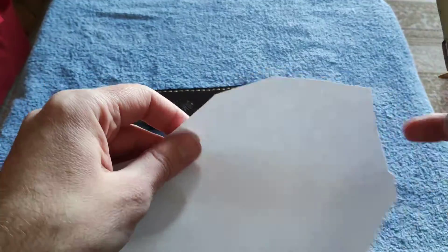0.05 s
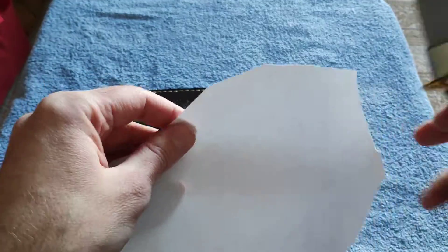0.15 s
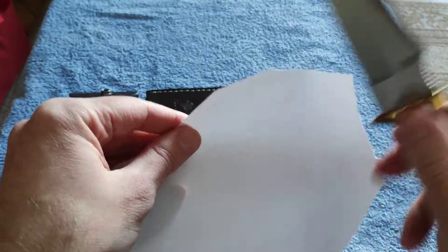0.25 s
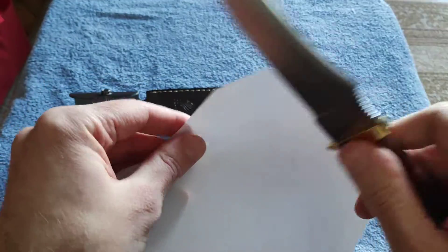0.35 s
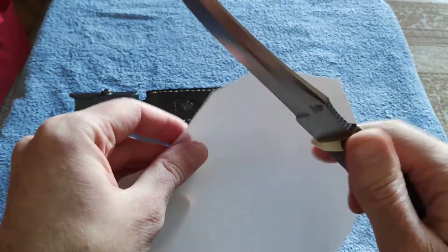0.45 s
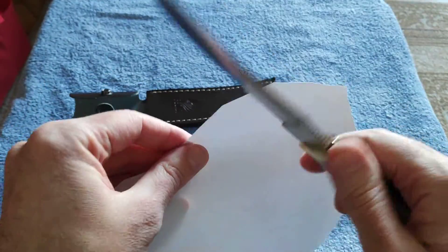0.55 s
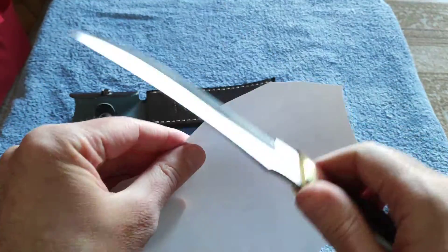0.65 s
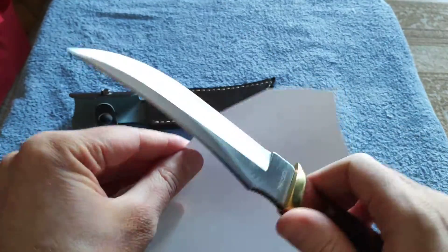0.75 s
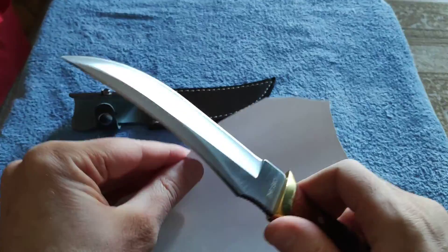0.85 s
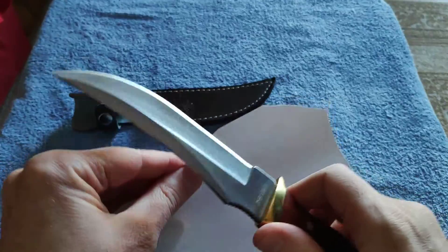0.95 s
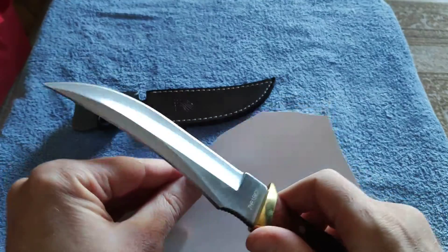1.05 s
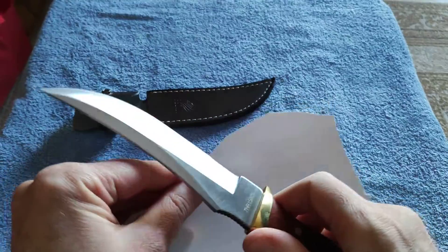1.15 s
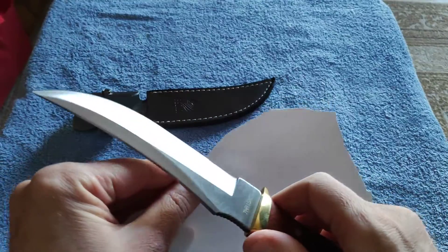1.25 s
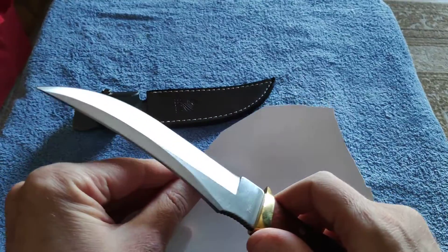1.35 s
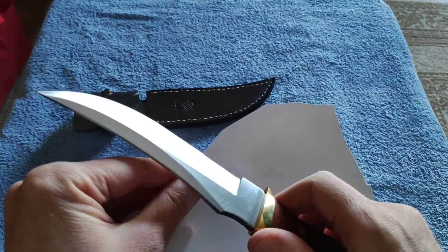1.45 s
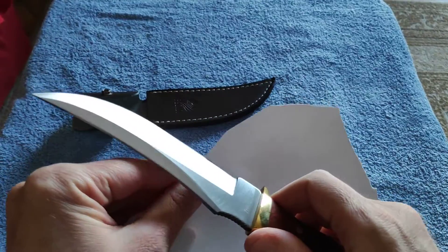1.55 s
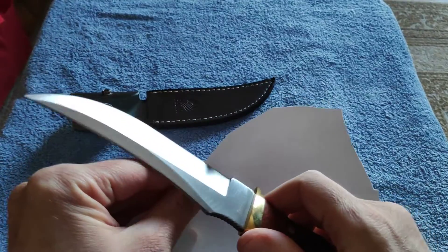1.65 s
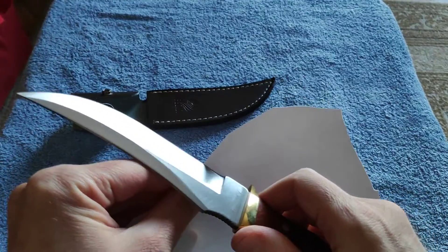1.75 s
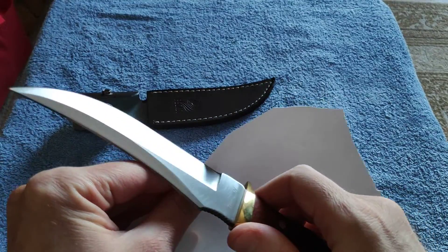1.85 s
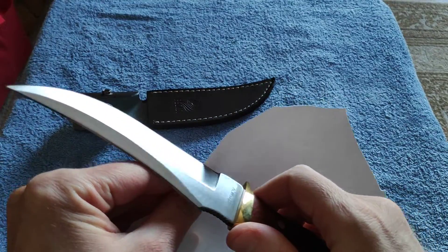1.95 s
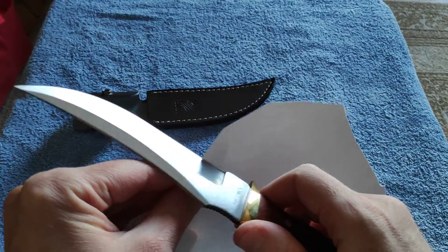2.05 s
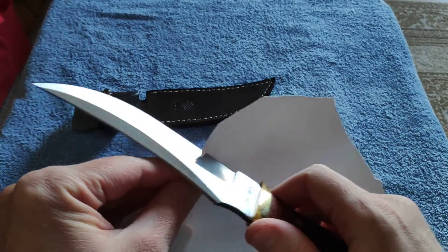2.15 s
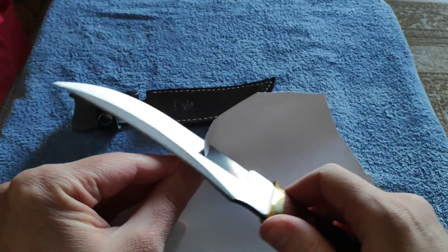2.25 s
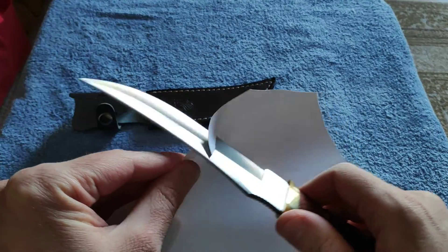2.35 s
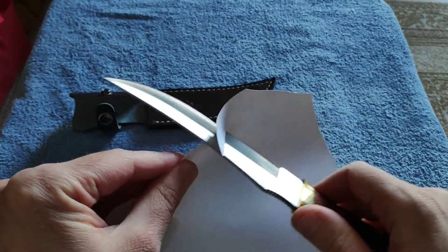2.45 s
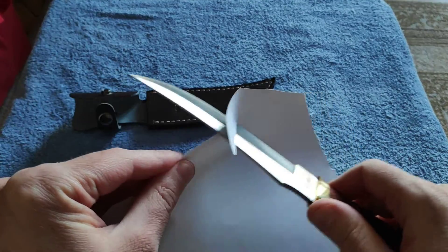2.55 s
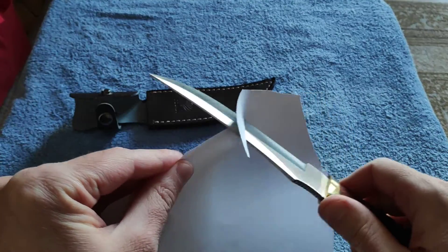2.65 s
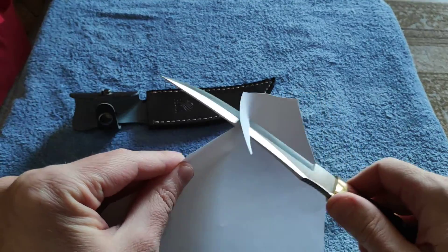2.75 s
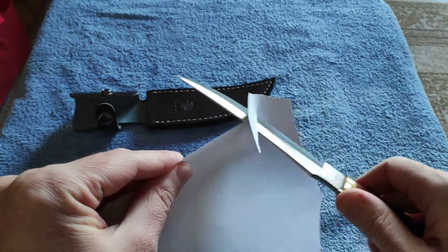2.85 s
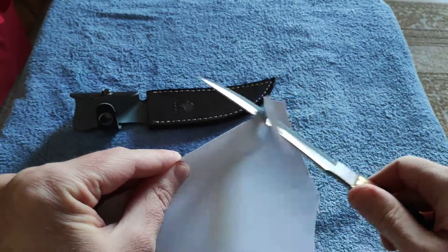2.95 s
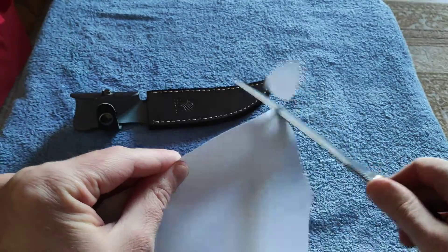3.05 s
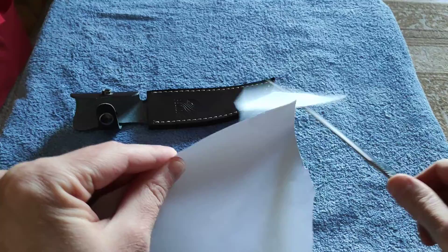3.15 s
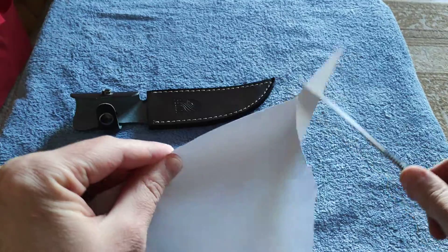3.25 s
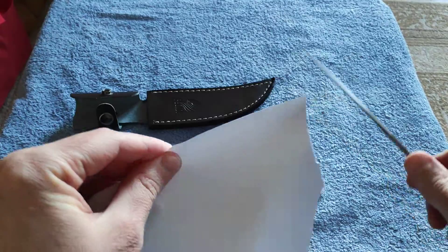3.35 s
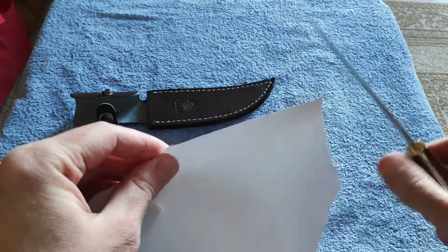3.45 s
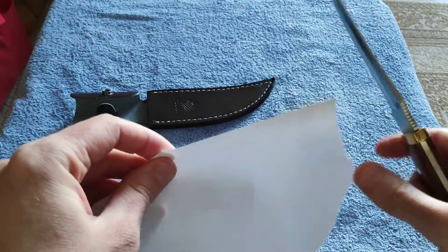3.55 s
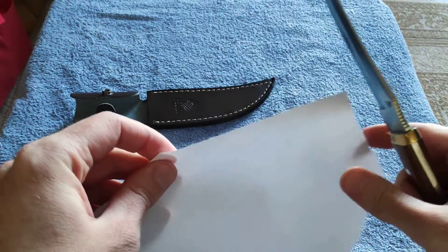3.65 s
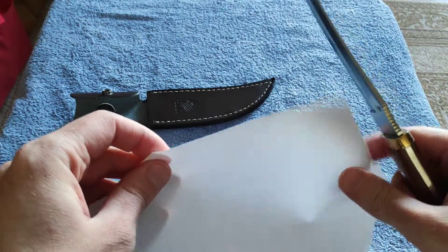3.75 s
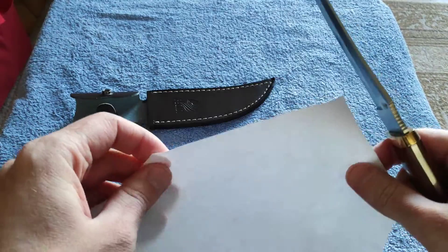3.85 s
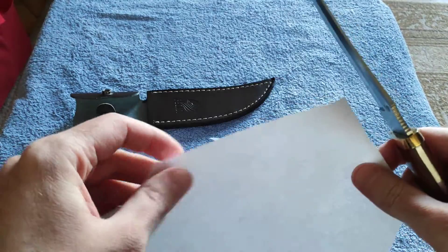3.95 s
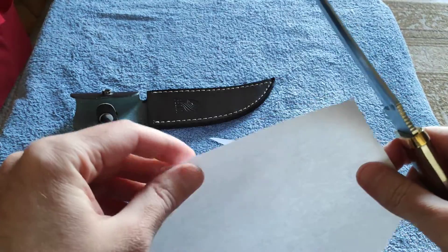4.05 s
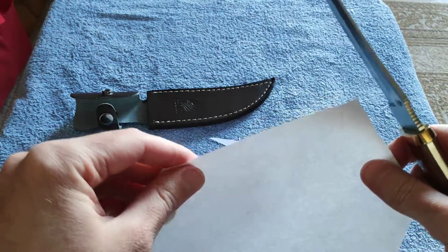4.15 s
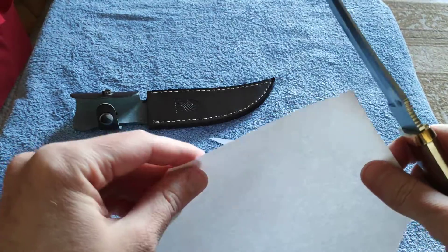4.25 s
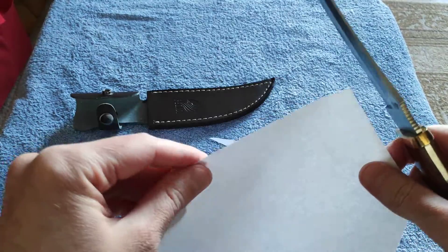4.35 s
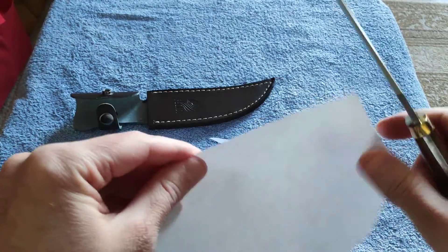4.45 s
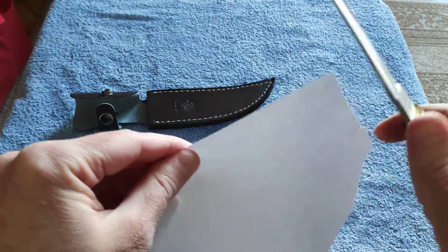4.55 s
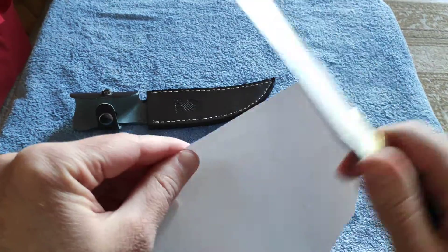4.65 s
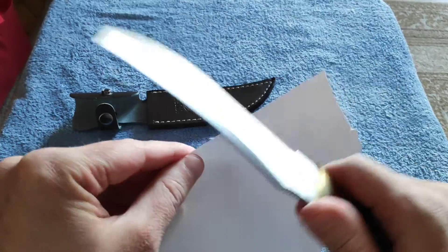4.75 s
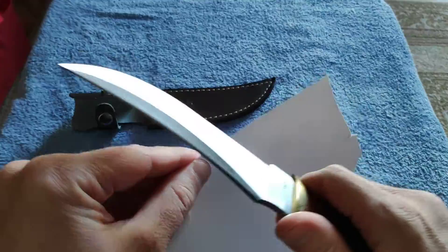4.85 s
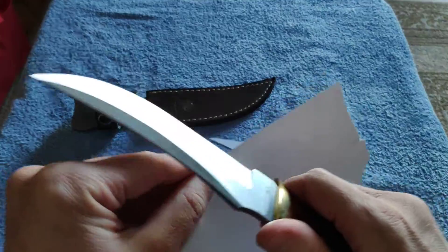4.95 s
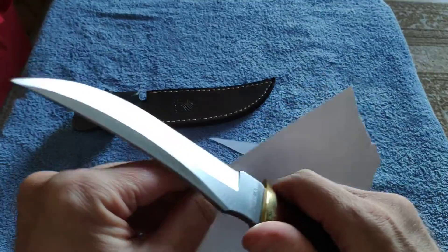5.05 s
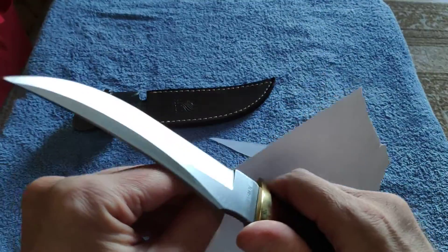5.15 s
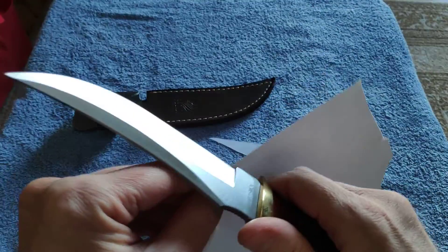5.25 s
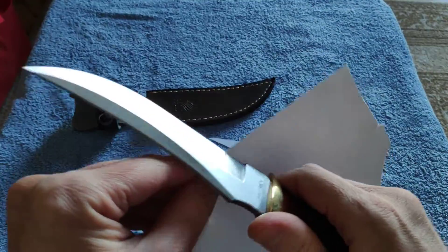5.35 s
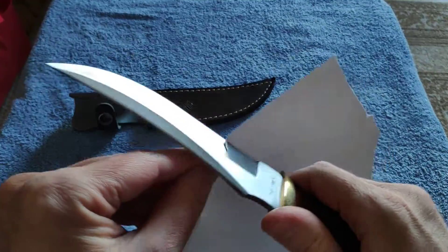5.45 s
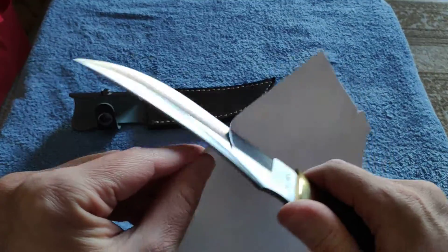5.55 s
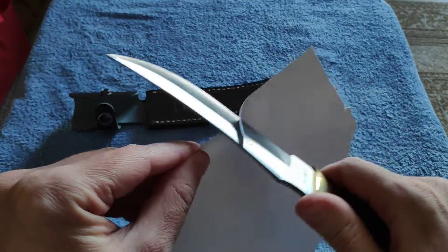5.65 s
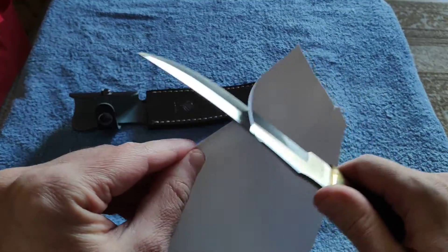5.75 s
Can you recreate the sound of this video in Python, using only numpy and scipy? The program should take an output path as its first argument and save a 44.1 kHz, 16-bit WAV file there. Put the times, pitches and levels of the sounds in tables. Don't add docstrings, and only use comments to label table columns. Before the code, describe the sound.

Paper is handled faintly at first, with dry rubs, dull knocks and two crisp clicks. A knife then draws through it, a bright fibrous swish growing louder and fuller until the strip snaps free. Rustles and one hard flap follow, then a brief second cut. Close microphone, small quiet room, very low rumble beneath.

```python
import sys
import numpy as np
from scipy import signal
from scipy.fft import rfft, irfft
from scipy.io import wavfile

SR = 44100
rng = np.random.default_rng(int(sys.argv[2]) if len(sys.argv) > 2 else 0)


def bounce(signal):
    frames = np.transpose(np.atleast_2d(signal))
    limited = np.clip(frames, -1, 1)
    pcm = np.round(limited * 32767).astype(np.int16)
    wavfile.write(sys.argv[1], SR, pcm)


def field_ratio(decibels):
    return 10 ** (np.asarray(decibels, dtype=float) / 20)


N = 256220
STEP = 32
SILENT_DB = -110


def rms_one(x):
    return x / np.sqrt(np.mean(x ** 2) + 1e-20)


def at_hz(points, hz):
    table_hz, values = np.transpose(points)
    return np.interp(np.log(hz), np.log(table_hz), values)


def clock():
    return np.arange(0, N + STEP, STEP) / SR


def full(control):
    return np.interp(np.arange(N) / STEP, np.arange(len(control)), control)


def drift(rate_hz):
    r = np.exp(-2 * np.pi * rate_hz * STEP / SR)
    white = rng.standard_normal(N // STEP + 3002)
    slow = signal.lfilter([1], [1, -2 * r, r * r], white)[3000:]
    return rms_one(slow)[:len(clock())]


def ring(x, hz, t60_s):
    r = field_ratio(-60 / (t60_s * SR))
    w = 2 * np.pi * min(hz, .45 * SR) / SR
    return signal.lfilter([0, np.sin(w)], [1, -2 * r * np.cos(w), r * r], x)


# start t/s, low body gain rate/(dB/s)
STRIP_GROWTH = [
    (2.1, 13),
    (5.3, 26),
]


def strip_depth():
    start_db, full_db = -9, 2.5
    t, depth_db = clock(), 0
    for s, db_per_s in STRIP_GROWTH:
        grown_db = np.minimum(start_db + db_per_s * np.maximum(t - s, 0), full_db)
        depth_db = np.where(t >= s - .2, grown_db, depth_db)
    return depth_db


# t/s, effort/dB, slack/dB (loose sheet shakes and hisses more)
CUTS = [
    [(2.088, -66, 0), (2.1, -52, -4), (2.16, -45, -3), (2.3, -44, 2.5), (2.39, -39.3, 0.6),
     (2.62, -38, 0.4), (2.78, -41, -0.6), (3.05, -34.5, -3.5), (3.128, -33.5, -1.5)],
    [(5.33, -76, -3), (5.366, -55.5, -8), (5.47, -49.5, 1.5), (5.55, -42.5, -6), (5.62, -38, -7),
     (5.7, -38.5, -5), (5.81, -42, -2)],
]


def cut_efforts():
    bite_db_per_s = 330
    let_go_db_per_s = [300, 700, 1000]
    hiss_db, hiss_per_slack, hiss_per_strip = 2.2, 0.4, 0.4
    flutter_s, flutter_db, fade_db_per_s = 3.19, -52, 150
    t = clock()
    rise_db = bite_db_per_s * np.minimum(t - flutter_s, 0)
    flutter = flutter_db + rise_db - fade_db_per_s * np.maximum(t - flutter_s, 0)
    out = np.maximum(flutter, SILENT_DB) * np.ones((3, 1))
    for s, db, slack_db in map(np.transpose, CUTS):
        slack = np.interp(t, s, slack_db)
        effort = np.interp(t, s, db) + bite_db_per_s * np.minimum(t - s[0], 0)
        hiss = effort + hiss_db + hiss_per_slack * slack + hiss_per_strip * strip_depth()
        let_go = np.outer(let_go_db_per_s, np.maximum(t - s[-1], 0))
        out = np.maximum(out, [effort + slack, hiss, effort] - let_go)
    return out


# f/Hz, density/(dB per Hz)
CUT_COLOUR = [(120, -42), (200, -9), (262, -15), (302, -9), (441, -4), (642, 1.5), (920, 1), (1270, -1.5),
              (1790, 1.5), (3060, -13), (3290, -11.5), (5340, -15), (9490, -8.5), (13100, 3),
              (14600, -12.5)]


def cuts():
    return paper(cut_efforts(), CUT_COLOUR, breaks_per_s=14000, spread_db=1.0, patchy_db=1.5,
                 curl_db=6.0, curl_octaves=0.16, modal=0.19, depth_db=strip_depth())


# t/s, f/Hz
CURL = [(2.1, 6500), (2.56, 6600), (2.63, 5200), (2.9, 4200), (2.98, 5700), (5.35, 6500), (5.62, 6900),
        (5.76, 6000)]
# t/s, f/Hz
OPPOSED = [(2.05, 3650), (2.1, 5300), (2.5, 3800), (2.8, 3350), (5.35, 3400), (5.81, 3930)]
# f/Hz, correlation/1
NEAR_LIKENESS = [(200, 0.94), (700, 0.98), (1300, 0.99), (2200, 0.76), (3300, 0.77), (4200, 0.55),
                 (5200, 0.62), (7000, 0.057), (14000, .05)]


def paper(efforts_db, colour, breaks_per_s, spread_db, patchy_db, curl_db, curl_octaves, modal, depth_db=0):
    busy = np.flatnonzero(full(efforts_db.max(0)) > SILENT_DB + 0.1)
    curl_hz = np.interp(clock(), *np.transpose(CURL))
    opposed_hz = np.interp(busy / SR, *np.transpose(OPPOSED))
    edges = 190 * 2 ** np.arange(0, 6.7, .2)
    centres = np.sqrt(edges[1:] * edges[:-1])
    density_db = at_hz(colour, np.minimum(centres, 14000))
    power = field_ratio(2 * density_db) * np.diff(edges)
    regions_hz = [(400, 2500), (3500, 8000), (9500, 14300)]
    region_power = [[power[(centres > lo) & (centres < hi)].sum()] for lo, hi in regions_hz]
    efforts = efforts_db - 10 * np.log10(region_power)

    size = field_ratio(spread_db * np.minimum(rng.exponential(1, (2, N)), 5))
    breaks = size * (rng.random((2, N)) < breaks_per_s / SR)
    grains = rng.standard_normal((2, 3, N)) * breaks[:, None]
    grains = rms_one(grains)[:, :, busy] + 1e-9

    out = np.zeros((2, len(busy)))
    together, neighbour = drift(38), drift(5.1)
    for k, hz in enumerate(centres):
        band = signal.butter(2, edges[k:k + 2], "band", fs=SR, output="sos")
        shared, left, right = signal.sosfilt(band, grains[k % 2])
        place = np.interp(np.log(hz), np.log([1880, 4320, 7800, 10200]), [0, 1, 1.2, 1.925])
        low = min(int(place), 1)
        effort = efforts[low] + (place - low) * (efforts[low + 1] - efforts[low])
        effort = effort + depth_db * np.clip(np.log2(900 / hz), 0, 1)
        previous, neighbour = neighbour, drift(10.4)
        patches = 0.46 * together + 0.73 * (previous + neighbour)
        level = effort + density_db[k] + 10 * np.log10(SR / 2) + patchy_db * patches
        bump = np.exp(-.5 * (np.log2(hz / curl_hz) / curl_octaves) ** 2)
        curl = curl_db * (bump - .4) * (3000 < hz < 9000)
        alike = np.clip(at_hz(NEAR_LIKENESS, hz), 0, .98)
        overlap = max(np.cos(np.pi * min(hz / 3600, 1) ** 1.9), -.3)
        boost = np.sqrt(2 / (1 + alike * overlap)) * ports(hz)
        lag = SR / (2 * hz) * (hz / opposed_hz) ** 1.563
        late = np.interp(np.arange(len(busy)) - lag, np.arange(len(busy)), shared)
        for c, (common, own, db) in enumerate([(late, left, level), (shared, right, level + curl)]):
            gain = np.interp(busy / STEP, np.arange(len(db)), field_ratio(db) * boost[c])
            out[c] += gain * (np.sqrt(alike) * common + np.sqrt(1 - alike) * own)
    placed = np.zeros((2, N))
    placed[:, busy] = np.sqrt(1 - modal) * out + np.sqrt(modal) * bending(out)
    return placed


def bending(x):
    t60_s, turns_per_s, count = 0.066, 9.034, 10
    t, out = np.arange(1500) / SR, 0
    turn = np.arange(x.shape[1]) / SR * turns_per_s
    rings = rng.standard_normal((count, 1, 1500)) * field_ratio(-60 * t / t60_s)
    for k, n in enumerate(rings):
        away = np.abs((turn - k + count / 2) % count - count / 2)
        weight = np.cos(np.pi / 2 * np.minimum(away, 1))
        unit = n / np.sqrt((n ** 2).sum())
        out = out + weight * signal.oaconvolve(x, unit, axes=1)[:, :x.shape[1]]
    return out


# f/Hz, left minus right level/dB
PORTS = [(250, 1), (2400, 2), (3300, 2.5), (4300, -4.5), (5400, -1.5), (6700, -14.5), (8200, 5.5),
         (9800, 8), (11500, 27.5), (13000, 51), (14500, 11)]


def ports(hz):
    share = 1 / (1 + field_ratio(-2 * at_hz(PORTS, hz)))
    return np.sqrt(2 * np.array([share, 1 - share]))


def snap(s, db, hold_s, fizz_db):
    lag_s = [0.008, 0, -0.003]
    rise_db_per_s, fall_db_per_s = [800, 1200, 1150], [700, 500, 950]
    shiver_db, shiver_fall_db_per_s = [-14, -15, -22], [170, 170, 230]
    body_db = 1.2
    out = []
    for k, (peak_db, held_s) in enumerate([(db + body_db, hold_s), (db, 0), (db + fizz_db, 0)]):
        t = clock() - s - lag_s[k]
        after = np.maximum(t - held_s, 0)
        shiver = shiver_db[k] - shiver_fall_db_per_s[k] * after
        fall = np.maximum(-fall_db_per_s[k] * after, shiver)
        out.append(peak_db + rise_db_per_s[k] * np.minimum(t, 0) + fall)
    return np.maximum(out, SILENT_DB)


# f/Hz, density/(dB per Hz)
FLAP_COLOUR = [(120, -45), (200, -19), (500, -7), (850, -3), (1200, -2.5), (1900, -5.5), (3400, -4.5),
               (8800, -11.5), (14600, -16)]


def flaps():
    tear_off = snap(3.172, -38.5, hold_s=0.003, fizz_db=-4)
    flap = snap(3.862, -36, hold_s=0.028, fizz_db=0.4)
    return paper(np.maximum(tear_off, flap), FLAP_COLOUR, breaks_per_s=3600, spread_db=1.5,
                 patchy_db=1.2, curl_db=-0.5, curl_octaves=1, modal=0.088)


# t/s, hiss peak/dB, body/dB and fizz/dB re hiss, hold/s
RUBS = [(.001, -62, -6, 2, .02), (.121, -60.5, 8, 3.5, .042), (.175, -62.5, -16, 5, .031),
        (.3, -60, -2, -2, .026), (.426, -60.5, 0, 2, .045), (.482, -62, -6, 2, .009),
        (.532, -61, -6, -0.6, .036), (.585, -64.5, -5, -5, .04), (.79, -67, -3, -9, .04),
        (.938, -52.5, -9, -0.6, .07), (1.104, -61, 7, -8, .02), (1.464, -40, -50, -14, .002),
        (3.547, -56, -6, -0.6, .036), (3.62, -70, -5, 2, .045), (3.822, -70, 22, -3, .02),
        (4.082, -80, 24, 3, .02), (4.27, -66.5, -2, -5, .06), (4.375, -66.5, -9, -8, .046),
        (4.458, -57, -5, -2, .01), (4.467, -50, -2, -2, .024)]
# t/s, body/dB, brightness/dB
RUSTLE = [(0.0, -66, -3), (0.116, -70, 3), (0.36, -80, 2), (0.58, -83, -5), (0.8, -73, -6), (0.97, -74, 2),
          (1.16, -70, -16), (1.44, -85, -10), (3.3, -95, -10), (3.42, -75, -25), (3.63, -77, -16),
          (3.8, -70, -8), (4.13, -72, -19), (4.25, -76, -12), (4.55, -63, -30), (4.75, -72, -10)]


def rub_efforts():
    attack_s, t60_s = 0.0013, 0.06
    t = clock()
    settled = (5.33, -70, -12)
    s, db, bright_db = np.transpose(RUSTLE + [settled])
    body = np.interp(t, s, db, right=SILENT_DB)
    bright = body + np.interp(t, s, bright_db)
    power = field_ratio(2 * np.array([body, bright, bright]))
    for s, db, body_db, fizz_db, hold_s in RUBS:
        decay = field_ratio(-60 * np.maximum(t - s - hold_s, 0) / t60_s)
        shape = np.clip((t - s) / attack_s, 0, 1) * decay
        power += (shape * field_ratio(db - 7 + np.array([[body_db - 2], [0], [fizz_db]]))) ** 2
    return 10 * np.log10(power)


# f/Hz, density/(dB per Hz)
RUB_COLOUR = [(120, -29), (200, -10.5), (556, 0.5), (783, 3.5), (1420, -6), (2180, -8), (3540, -12.5),
              (3940, -15), (6750, -12.5), (13100, -15), (14600, -13.5)]


def rubs():
    return paper(rub_efforts(), RUB_COLOUR, breaks_per_s=9000, spread_db=3.5, patchy_db=2.6,
                 curl_db=-3, curl_octaves=1, modal=0.19)


# t/s, peak/dB, ring f/Hz, low part/dB
TICKS = [(0.0789, -41.5, 5610, -5), (0.2638, -51, 6200, -14), (0.7793, -48, 4400, -7.5),
         (1.1109, -51, 3180, -15), (1.4634, -36, 5760, -24), (1.5044, -62, 7800, -25),
         (1.5243, -34, 5000, -32), (1.542, -48, 7000, -13), (1.57, -50, 4500, -23),
         (1.697, -56, 13500, -30), (1.842, -57, 4580, -9), (2.0982, -43, 12500, -25),
         (3.1027, -18, 6760, -14), (3.1287, -26, 6210, -8), (3.1789, -23, 3300, -5),
         (3.2468, -32, 13900, -17), (3.299, -47, 6120, -19), (3.3124, -39.5, 3900, -22),
         (3.756, -51, 9000, -2), (3.8496, -30, 7000, -19), (3.863, -21, 3600, -9), (4.0883, -58, 2500, -12),
         (4.3316, -57, 7040, -11), (4.6029, -64, 7000, -7)]


def ticks():
    t60_s, scatter_t60_s, crease_ring, pan_db = 0.0085, 0.062, 0.7, 2.2
    length = 4000
    out, t = np.zeros((2, N + length)), np.arange(length) / SR
    noise = rng.standard_normal((len(TICKS), 2, length))
    noise[:, :, 0] = 2.86
    bright = signal.butter(3, 3500, "high", fs=SR, output="sos")
    decay = field_ratio(-60 * t / t60_s) + 0.15 * field_ratio(-60 * t / scatter_t60_s)
    for (s, db, hz, low_db), n in zip(TICKS, noise):
        burst = (0.49 * n[0] + 0.72 * n) * decay
        crack = signal.sosfilt(bright, burst + crease_ring * ring(burst, hz, .002))
        push = ring(np.diff(burst.mean(0), prepend=0), 1200, 0.002)
        shape = crack / np.abs(crack).max() + field_ratio(low_db + 5) * push / np.abs(push).max()
        start = round(s * SR)
        out[:, start:start + length] += field_ratio(db - 1.0) * shape * field_ratio([[pan_db], [-pan_db]])
    return through_ports(out[:, :N])


def through_ports(x):
    left = x[0] + 1.3 * ring(x[0], 13000, .0008)
    right = x[1] + 1.2 * ring(x[1], 5900, .0012)
    dull = signal.butter(1, 9000, fs=SR, output="sos")
    return lagged(np.array([left, signal.sosfilt(dull, right)]))


def lagged(x):
    lag_s = 0.00011
    late = np.interp(np.arange(N) - lag_s * SR, np.arange(N), x[0])
    return np.array([late, x[1]])


# t/s, peak/dB, ring f/Hz, t60/s
BUMPS = [(0.055, -49, 410, 0.086), (0.074, -39, 825, 0.17), (0.276, -51, 308, 0.076),
         (0.31, -53, 493, 0.091), (0.357, -59.5, 581, 0.17), (0.501, -50, 390, 0.094),
         (1.171, -46.5, 680, 0.24), (3.821, -44, 1180, 0.1), (4.079, -52, 412, 0.28),
         (4.427, -50.5, 674, 0.068), (4.641, -46, 635, 0.058)]


def bumps():
    attack_s, length = 0.0028, 8000
    out, t = np.zeros(N + length), np.arange(length) / SR
    for (s, db, hz, t60_s), n in zip(BUMPS, rng.standard_normal((len(BUMPS), length))):
        envelope = field_ratio(-60 * t / t60_s) * np.minimum(t / attack_s, 1)
        puff = ring(n * envelope, hz, 3.0 / hz)
        start = round(s * SR)
        out[start:start + length] += field_ratio(db + 2) * puff / np.abs(puff).max()
    return lagged(np.array([out[:N], out[:N]]))


# f/Hz, t60/s
ROOM_T60 = [(300, 0.49), (2000, 0.49), (6000, 0.36), (14000, 0.067)]


def room(x):
    t, tail = np.arange(SR // 2) / SR, 0
    white = rng.standard_normal((2, len(t)))
    for low_hz in 200 * 2. ** np.arange(6):
        octave = signal.butter(2, [low_hz, 2 * low_hz], "band", fs=SR, output="sos")
        decay = field_ratio(-60 * t / at_hz(ROOM_T60, 1.4 * low_hz))
        tail = tail + signal.sosfilt(octave, white) * decay * (t > .005)
    tail = tail / np.sqrt((tail ** 2).sum(1, keepdims=True))
    return signal.fftconvolve(x, tail, axes=1)[:, :N]


# f/Hz, level/dB
ROOM_TONE = [(4.7, -30.5), (8.0, -3.5), (53, -5.5), (158, -18.5), (204, -15.5), (326, -30), (394, -23.5),
             (522, -34.5), (651, -30.5), (979, -34), (1620, -35), (2290, -42), (14600, -49.5)]
# f/Hz, correlation/1
ROOM_LIKENESS = [(60, 0.97), (130, 0.97), (290, 0.9), (640, 0.21), (1410, -0.39), (3100, -0.08),
                 (6820, -0.11), (15000, 0.17)]
# f/Hz, left minus right level/dB
ROOM_BALANCE = [(60, 0.5), (1500, 0), (5000, -6), (9000, -2), (13000, 11.5)]


def room_tone():
    level_db = -56
    hz = np.maximum(np.fft.rfftfreq(N, 1 / SR), 1)
    mid, side = rfft(rng.standard_normal((2, N))) * field_ratio(at_hz(ROOM_TONE, hz))
    alike = np.clip(at_hz(ROOM_LIKENESS, hz), -.9, .99)
    lean_db = at_hz(ROOM_BALANCE, hz) / 2
    side = side * np.sqrt((1 - alike) / (1 + alike))
    scale = np.sqrt(np.mean(irfft(mid * (hz > 30), N) ** 2))
    pair = np.array([(mid + side) * field_ratio(lean_db), (mid - side) * field_ratio(-lean_db)])
    return field_ratio(level_db) * irfft(pair, N) / scale * full(field_ratio(0.23 * drift(1)))


# t/s, level/dB
SWAY = [(0.0, -51), (0.32, -53), (1.57, -61), (2.72, -50.5), (2.86, -77), (3.01, -55.5), (4.08, -56),
        (4.22, -47), (4.76, -67), (4.92, -44), (5.29, -58), (5.47, -46), (5.81, -44)]


def air_sway():
    s, db = np.transpose(SWAY)
    band = signal.butter(3, [3, 15], "band", fs=SR, output="sos")
    noise = rng.standard_normal(N + SR) + 0.067 * rng.standard_normal((2, N + SR))
    sway = signal.sosfilt(band, noise)[:, SR:]
    return field_ratio(np.interp(np.arange(N) / SR, s, db) + 3) * rms_one(sway)


# f/Hz, width/Hz, level/dB
HUM = [(39.2, 3.1, -67.5), (52, 6, -70), (62.5, 3.2, -70), (121, 5, -71.5), (197, 21, -74), (402, 57, -82)]


def hum():
    out = 0
    for (hz, width_hz, db), n in zip(HUM, rng.standard_normal((len(HUM), N + SR))):
        out = out + field_ratio(db) * rms_one(ring(n, hz, 1.66 / width_hz)[SR:])
    return out


def scene():
    near = cuts() + flaps() + rubs()
    knocks = bumps()
    tail = room(field_ratio(-17) * near + field_ratio(-19) * knocks)
    return near + ticks() + knocks + tail + room_tone() + air_sway() + hum()


def band_limit(x):
    return signal.sosfilt(signal.butter(12, 15600, fs=SR, output="sos"), x)


def record(dry):
    cutoff_hz, ceiling = 14300, .3
    rounded = ceiling * np.tanh(dry / ceiling)
    low_pass = signal.ellip(12, .5, 70, cutoff_hz, fs=SR, output="sos")
    mix = signal.sosfilt(low_pass, rounded)
    return band_limit(mix)


dry = scene()
out = record(dry)
bounce(out)
```